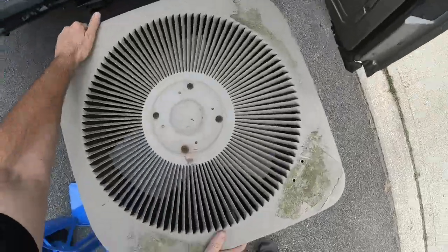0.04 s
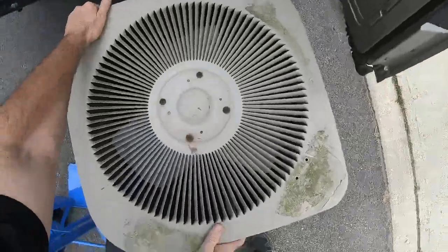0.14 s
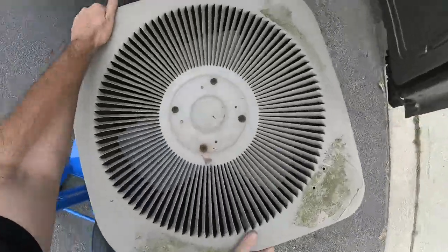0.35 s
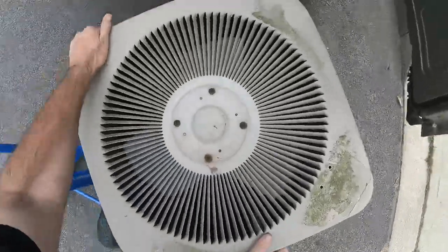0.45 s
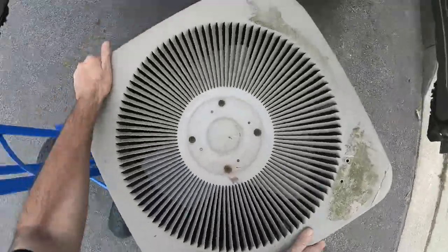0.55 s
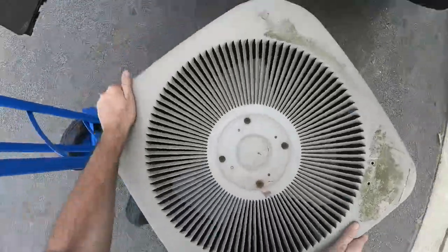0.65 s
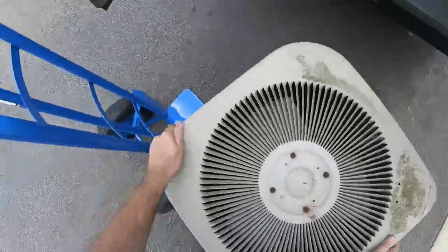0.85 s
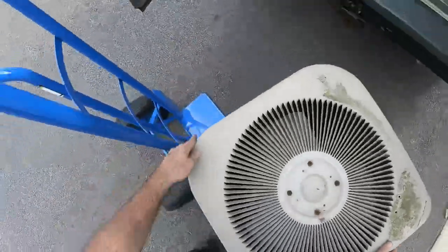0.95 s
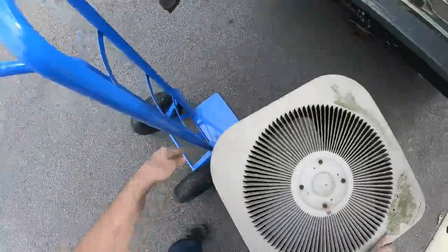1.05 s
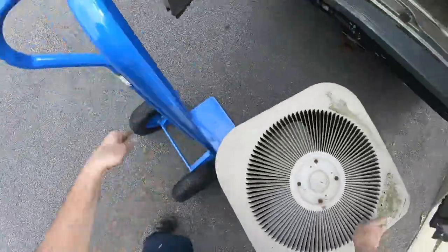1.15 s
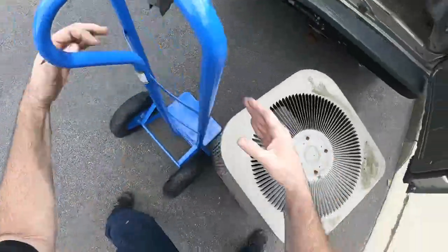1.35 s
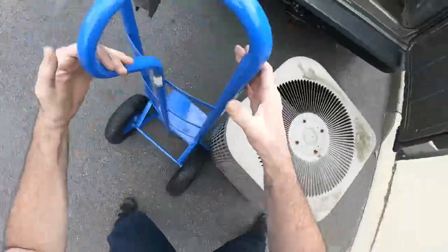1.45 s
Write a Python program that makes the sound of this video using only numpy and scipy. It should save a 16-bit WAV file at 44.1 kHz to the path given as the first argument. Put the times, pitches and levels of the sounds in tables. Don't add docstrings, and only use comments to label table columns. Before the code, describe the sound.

Close head-worn microphone on a driveway: a bird chirp and light shoe scrape, then a hollow metal casing judders and grinds over grit, thudding hard before a bright clank, leaving street hum and soft wind.

```python
import sys
import numpy as np
from scipy import signal
from scipy.fft import rfft, irfft
from scipy.io import wavfile
from scipy.ndimage import uniform_filter1d

SR = 44100
rng = np.random.default_rng(int(sys.argv[2]) if len(sys.argv) > 2 else 0)


def magnitude_from_level(level_db):
    exponent = np.asarray(level_db, float) / 20
    return 10 ** exponent


def master(y):
    cut = np.clip(np.atleast_2d(y).T, -1, 1)
    pcm = np.round(cut * 32767)
    wavfile.write(sys.argv[1], SR, pcm.astype(np.int16))


N = 66150

# (frequency [Hz], level [dB])
GRIT_COLOUR = [(400, -3), (750, -8), (1600, -14), (3300, -19), (4500, -26), (5700, -18.5), (7600, -29.5),
               (8600, -40), (14000, -50.5), (15600, -57)]
GRIT_PER_S, GRIT_SPREAD_DB = 9000, 2.5


def col(table, k):
    return np.array(table, float)[:, k]


def curve(table, k):
    return np.interp(np.arange(N) / SR, col(table, 0), col(table, k))


def colour(x, table, scale=1, steep=True):
    log_hz = np.log(np.arange(N // 2 + 1) * SR / N + 1)
    db = np.interp(log_hz, np.log(col(table, 0)), col(table, 1))
    db = db - 30 * steep * np.maximum(np.log(table[0][0]) - log_hz, 0)
    return irfft(rfft(x) * magnitude_from_level(scale * db), N)


def unit(x):
    return x / np.sqrt(np.mean(x ** 2))


def walk(rate):
    k = int(SR / rate)
    held = np.repeat(rng.standard_normal(N // k + 1), k)
    return unit(uniform_filter1d(held, k)[:N])


def clicks(per_s, spread_db):
    chance, sign, size = rng.random((3, N))
    struck = chance < per_s / SR
    return unit(struck * np.sign(sign - .5) * magnitude_from_level(-spread_db * np.log(1 - size)))


def band(x, hz, width):
    return signal.lfilter(*signal.iirpeak(hz, hz / width, fs=SR), x)


def add(out, s, x):
    i = int(s * SR)
    out[i:i + len(x)] += x[:N - i]


def progress(length_s):
    return np.arange(int(length_s * SR)) / (length_s * SR)


def ring(modes, push_s, phases):
    t = np.arange(int(SR / 4)) / SR
    out = np.zeros(len(t))
    for (hz, db, t60), phase in zip(modes, phases):
        fall_db = 60 * (t / max(t60, .008)) ** 1.4
        out += magnitude_from_level(db - fall_db) * np.sin(2 * np.pi * (hz * t + phase))
    return (1 - np.exp(-t / push_s)) * out


def grit():
    # (time [s], level [dB])
    drag = [(0.04, -75), (0.092, -55.5), (0.158, -54.5), (0.354, -37), (0.39, -38.5), (0.4, -31),
            (0.422, -33.5), (0.442, -29.5), (0.478, -33), (0.506, -39), (0.562, -33.5), (0.65, -31.5),
            (0.754, -34), (0.804, -43), (0.832, -38), (0.92, -55.5), (1.05, -64)]
    stones = clicks(GRIT_PER_S, GRIT_SPREAD_DB) * magnitude_from_level(1.3 * walk(89.46))
    fines = 0.66 * rng.standard_normal(N)
    after_stop = np.maximum(np.arange(N) / SR - drag[-1][0], 0)
    return unit(colour(stones + fines, GRIT_COLOUR)) * magnitude_from_level(curve(drag, 1) + 7 - 60 * after_stop)


def judder():
    # (time [s], judder level [dB])
    load = [(0, -60.5), (.1, -33.5), (.19, -29.5), (.24, -25.5), (.263, -38), (.3, -20.5), (.375, -22.5),
            (.388, -40), (.44, -15.5), (.47, -28), (.482, -30), (.59, -24), (.64, -29), (.651, -46),
            (.667, -48), (.69, -25), (.75, -26.5), (.785, -33.5), (1.0, -51), (1.5, -49.5)]
    # (frequency [Hz], width [Hz], level [dB])
    boom = [(206, 15, -2), (252.3, 36, -3.5), (316.6, 25.8, 2), (352.4, 23.6, -3), (440, 20.7, -5),
            (557, 105, -11.5), (690, 250, -22), (815, 67, -15)]
    slips = clicks(1100, 2) * magnitude_from_level(curve(load, 1))
    gain = 1 / np.sqrt(sum(magnitude_from_level(2 * db) * width * np.pi / SR for _, width, db in boom))
    out = np.zeros(N)
    for k, (hz, width, db) in enumerate(boom):
        out += (-1) ** k * magnitude_from_level(db) * band(slips, hz, width)
    return gain * out


def bumps(tick):
    # (time [s], peak level [dB], panel pitch [Hz], ring t60 [s])
    bump_table = [(.103, -23.5, 334, 0.034), (.179, -29.5, 353, 0.084), (0.202, -16.5, 339.5, 0.068),
                  (0.2677, -15, 336, 0.097), (.3125, -11.5, 377, 0.017), (0.34, -16, 300, 0.096),
                  (0.3665, -10, 334, 0.044), (0.402, -7.5, 361, 0.034), (.4065, -2.5, 379, 0.028),
                  (0.4175, -3.5, 317, 0.03), (0.426, -10, 300, 0.016), (0.4339, -4, 309, 0.03),
                  (0.453, -13, 309.8, 0.12), (0.4751, 2, 428, .013), (0.669, -9, 277, 0.044),
                  (.757, -4, 279, 0.045), (.949, -23.5, 301, 0.083), (.624, -9, 307.5, .06),
                  (.634, -9.5, 298.5, 0.043), (.3757, -11, 330, 0.021), (.279, -20, 340, 0.053),
                  (.492, -12, 303, 0.031), (0.501, -16, 331, 0.029), (.529, -8.5, 316, 0.022),
                  (0.544, -15.5, 300, 0.035), (.562, -16, 284, 0.035), (.573, -21, 310, 0.035),
                  (.584, -18, 316, 0.032), (.395, -12, 312, 0.027), (.737, -17, 285, 0.071),
                  (.23, -22, 348, 0.052), (.243, -20.5, 336, 0.047), (0.484, -21, 316, 0.032),
                  (0.516, -14, 332, 0.04), (.602, -12, 277, 0.065), (0.6913, -13, 306, 0.057),
                  (.702, -12, 287.7, 0.075), (.715, -8, 295.3, 0.05), (0.799, -19.5, 290, 0.026),
                  (.810, -16.5, 304, 0.034), (.882, -31.5, 300, 0.064), (1.085, -37.5, 295.3, 0.15),
                  (1.297, -41.5, 368, 0.031)]
    # (times the pitch [ratio], level [dB], share of the ring time [ratio])
    panel = [(1, 0, 1), (.73, -20, .6), (1.45, -11, .45), (1.95, -13, .4), (2.55, -19, .3), (3.3, -26, .3)]
    tick_db, tick_s = -41, 0.0034
    out, gate = np.zeros(N), np.zeros(N)
    t = np.arange(int(SR / 10)) / SR
    for s, db, hz, t60 in bump_table:
        modes = [(hz * ratio, db + level + 2, t60 * share) for ratio, level, share in panel]
        add(out, s, ring(modes, .0012, np.zeros(len(panel))))
        add(gate, s, magnitude_from_level(db + tick_db) * np.exp(-t / tick_s))
    return out + gate * tick


def knocks():
    # (time [s], peak level [dB], pitch [Hz], ring t60 [s])
    knock_table = [(.187, -25, 408, .03), (.203, -23.5, 528, 0.066), (.211, -23.5, 454, 0.04),
                   (.222, -21.5, 416, 0.046), (.268, -18.5, 452, 0.035), (.272, -21, 214, 0.1),
                   (.285, -18.5, 583, .03), (.313, -19.5, 516, 0.015), (.336, -25.5, 230, 0.044),
                   (.362, -19.5, 214, 0.065), (.4745, -12.5, 785, 0.012), (.462, -23, 204, 0.084),
                   (.484, -15, 235.5, 0.069), (.529, -17, 593, 0.03), (.584, -18.5, 557, 0.038),
                   (.592, -17, 557, 0.05), (.607, -15, 530, .06), (.618, -20, 498, 0.03),
                   (.669, -13.5, 552, 0.025), (.690, -18, 488, .04), (.608, -20, 721, 0.054),
                   (.759, -14, 754, 0.016), (.700, -30, 580, .03), (.731, -18.5, 480, 0.043),
                   (.7575, -14.5, 562, 0.023), (.826, -28, 390, 0.023), (.948, -25.5, 440, 0.037),
                   (.9485, -33.5, 600, .02), (.862, -39, 1460, .06), (1.2, -48.5, 760, 0.091),
                   (1.255, -43, 612, 0.044), (1.3, -44.5, 487, 0.044)]
    out = np.zeros(N)
    for s, db, hz, t60 in knock_table:
        add(out, s, ring([(hz, db, t60)], .0006, [0]))
    return out


def clanks(tick):
    # (time [s], level [dB])
    clank_table = [(.8265, -28.5), (.8295, -31), (.833, -37), (.8365, -29), (.841, -52), (.849, -40.5),
                   (.866, -49), (0.37, -35.5), (0.53, -33), (0.22, -41), (.335, -31.5), (0.092, -45),
                   (.269, -36), (.399, -37), (.445, -33.5), (0.6, -37), (0.26, -38), (0.45, -40)]
    # (frequency [Hz], level [dB], ring t60 [s])
    plate = [(1100, 0, .022), (1292, 0, .025), (1427, -5, .03), (1560, -3, .025), (1780, -5, .025),
             (2046, -3, .03), (2331, -4, .022), (2600, -7, .02), (2885, -7, .02)]
    crack_hz, crack_width_hz, crack_s = 1500, 1600, 0.0036
    crack = unit(band(band(tick, crack_hz, crack_width_hz), crack_hz, crack_width_hz))
    out, gate = np.zeros(N), np.zeros(N)
    t = np.arange(int(SR / 10)) / SR
    for s, db in clank_table:
        add(out, s, magnitude_from_level(db) * ring(plate, 0.001, rng.random(len(plate))))
        add(out, s, magnitude_from_level(db) * np.exp(-t / crack_s) * crack[int(s * SR):][:len(t)])
        add(gate, s, magnitude_from_level(db - 9.5) * np.exp(-t / 0.014))
    return out + gate * tick


def snaps():
    # (time [s], level [dB])
    snap_table = [
        (.381, -39),
        (.475, -46),
    ]
    out, t = np.zeros(N), np.arange(int(SR / 100)) / SR
    for s, db in snap_table:
        noise = rng.standard_normal(len(t))
        add(out, s, magnitude_from_level(db) * np.diff(noise, prepend=0) * np.exp(-t / .001))
    return out


def scuffs():
    # (time [s], length [s], level [dB])
    scuff_table = [
        (1.056, 0.1, -54),
        (1.4, 0.26, -59.5),
        (1.283, .06, -65),
        (0.066, 0.065, -52),
        (0, .07, -59),
        (0.832, 0.087, -48.5),
    ]
    gate = np.zeros(N)
    for s, length, db in scuff_table:
        u = progress(length)
        add(gate, s, magnitude_from_level(db) * np.minimum(u * 12, 1) * np.sqrt(1 - u ** 2))
    sole_colour = [(1200, 0), (2600, 6.5), (4000, 2.5), (5500, 7.0), (7500, -5.0), (10000, -29), (14000, -41.5)]
    return gate * unit(colour(clicks(6000, 0.86), sole_colour))


def birds():
    # (time [s], length [s], from [Hz], to [Hz], level [dB])
    bird_table = [
        (0, .027, 5700, 3500, -41),
        (.012, .02, 6000, 4200, -52),
        (.081, .022, 4050, 4250, -51),
        (1.225, .02, 3600, 4400, -67),
        (1.258, .016, 4300, 3300, -65),
        (1.102, .01, 2700, 2650, -52),
    ]
    out = np.zeros(N)
    for s, length, hz0, hz1, db in bird_table:
        u = progress(length)
        env = np.minimum(u * length / 0.00081, 1) * (1 - u ** 3)
        hz = hz0 + (hz1 - hz0) * u ** 1.9
        add(out, s, magnitude_from_level(db) * env * np.sin(2 * np.pi * np.cumsum(hz) / SR))
    return out * magnitude_from_level(2.5 * walk(400))


def chirrs():
    # (time [s], length [s], pitch [Hz], level [dB])
    chirr_table = [
        (.005, .075, 5750, -54),
        (1.281, .06, 5500, -62),
        (1.35, .04, 5500, -70),
        (1.065, .04, 5000, -63),
        (1.24, .022, 4400, -61),
        (1.245, .015, 3500, -65),
        (1.375, .03, 5600, -68),
    ]
    out = np.zeros(N)
    for s, length, hz, db in chirr_table:
        u = progress(length)
        rough = unit(band(band(rng.standard_normal(len(u)), hz, 260), hz, 260))
        add(out, s, magnitude_from_level(db) * np.minimum(u * 8, 1) * (1 - u ** 2) * rough)
    return out


def wind():
    # (time [s], level [dB])
    gusts = [(0.0, -35.5), (0.104, -38), (0.196, -34), (0.216, -35), (0.706, -44), (0.814, -33),
             (0.968, -50.5), (1.27, -47.5), (1.39, -35), (1.5, -46.5)]
    puff_colour = [(12, -21), (30, -5), (60, -9.5), (120, -11.5), (250, -22), (600, -94.5)]
    puff = colour(rng.standard_normal(N), puff_colour)
    return unit(puff) * magnitude_from_level(curve(gusts, 1) + 1.3 * walk(13.2))


def drone():
    # (time [s], level [dB])
    engine = [(0, -38.5), (.15, -46.5), (.4, -40), (.6, -54), (.85, -52), (.92, -39), (1.05, -48),
              (1.2, -53.5), (1.5, -55)]
    hz, width_hz = 138.2, 36.5
    return unit(band(band(rng.standard_normal(N), hz, width_hz), hz, width_hz)) * magnitude_from_level(curve(engine, 1))


def street():
    # (frequency [Hz], level [dB])
    hum = [(90, -12), (320, -0.5), (450, -18.5), (800, -14), (2000, -23.5), (5500, -33.5), (7200, -41.5),
           (9000, -55), (13000, -68), (15600, -71)]
    return unit(colour(rng.standard_normal(N), hum)) * magnitude_from_level(-49.5 + 0.6 * walk(4.5))


def yard_echo(x):
    t60_s, level_db = .15, -20
    t = np.arange(int(SR / 2)) / SR
    tails = rng.standard_normal((2, len(t))) * magnitude_from_level(-60 * t / t60_s) * (t > .004)
    return [magnitude_from_level(level_db) * signal.fftconvolve(x, tail / np.sqrt(np.sum(tail ** 2)))[:N] for tail in tails]


def ports(mid, other):
    # (frequency [Hz], level [dB])
    unlike = [(100, -4), (300, -23), (600, -8), (1200, -1.5), (2400, -7.5), (4500, -15), (8000, -1),
              (14000, -0.5)]
    # (frequency [Hz], level [dB])
    turned = [(100, -24), (500, -19), (1200, -6.5), (2200, -20.5), (5000, -5.5)]
    # (frequency [Hz], left minus right [dB])
    lean = [(100, 3.5), (250, -2.5), (500, -4), (1000, -4), (2000, -0.5), (4000, -3), (8000, 3), (12000, 1)]
    side = colour(other, unlike, steep=False)
    side = side + colour(signal.hilbert(mid).imag, turned, steep=False)
    both, apart = wind(), magnitude_from_level(-7.5) * wind()
    left = colour(mid + side, lean, scale=1 / 2, steep=False) + magnitude_from_level(-3.5) * (both + apart)
    right = colour(mid - side, lean, scale=-1 / 2, steep=False) + magnitude_from_level(.5) * (both - apart)
    return np.array([left, right])


def scene():
    tick = unit(colour(clicks(GRIT_PER_S, GRIT_SPREAD_DB), GRIT_COLOUR))
    hits = bumps(tick) + knocks() + clanks(tick) + judder()
    hits = signal.sosfilt(signal.butter(N=3, Wn=165, btype="high", fs=SR, output="sos"), hits)
    bird = birds() + chirrs()
    echo = yard_echo(hits + bird)
    mid = hits + drone() + snaps() + echo[0] + grit() + scuffs() + street() + bird
    smear = rng.standard_normal(int(SR / 100)) * np.hanning(int(SR / 100))
    smeared = signal.fftconvolve(hits, smear / np.sqrt(np.sum(smear ** 2)))[:N]
    other = smeared + echo[1] + grit() + scuffs() + street() + bird
    return ports(mid, other)


def low_pass(x):
    return signal.sosfilt(signal.butter(12, 15630, fs=SR, output="sos"), x)


def record(dry):
    rounded = np.tanh(0.56 * dry) / 0.64
    top = signal.ellip(N=8, rp=.2, rs=60, Wn=15700, fs=SR, output="sos")
    mix = signal.sosfilt(top, rounded)
    return low_pass(mix)


dry = scene()
out = record(dry)
master(out)
```